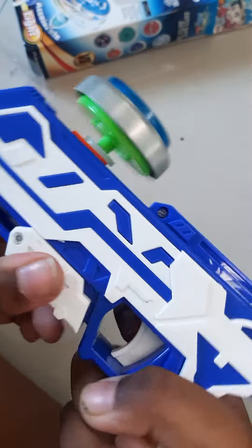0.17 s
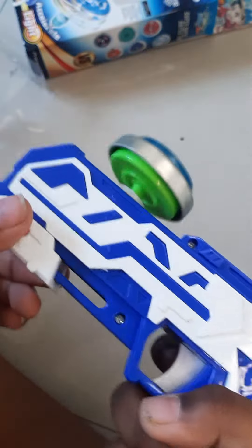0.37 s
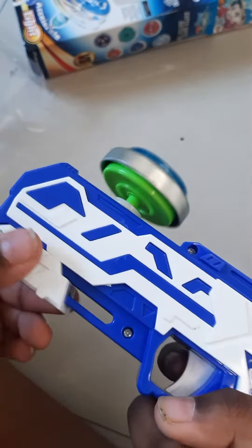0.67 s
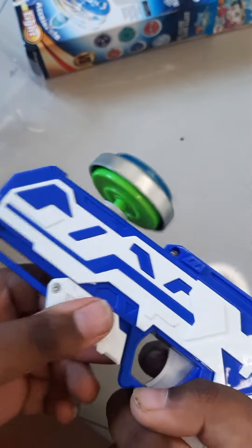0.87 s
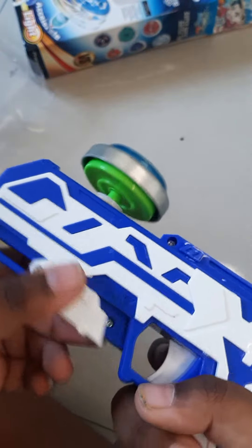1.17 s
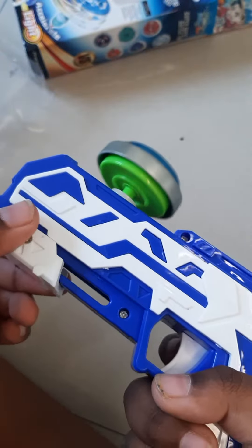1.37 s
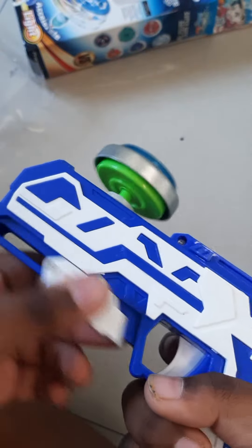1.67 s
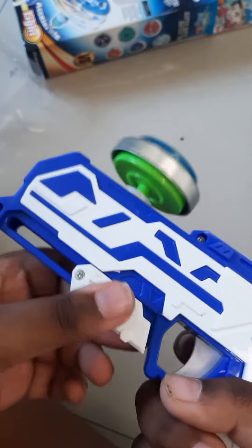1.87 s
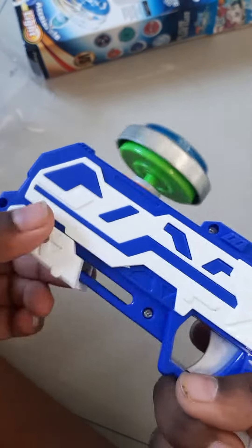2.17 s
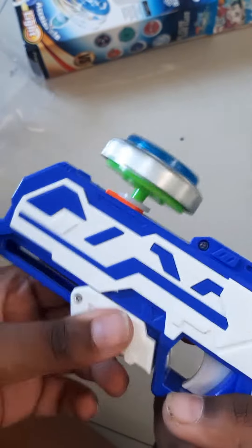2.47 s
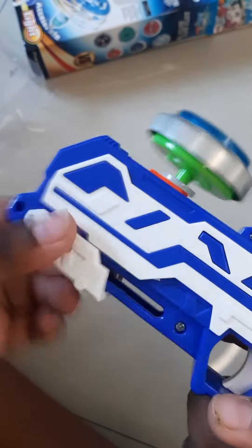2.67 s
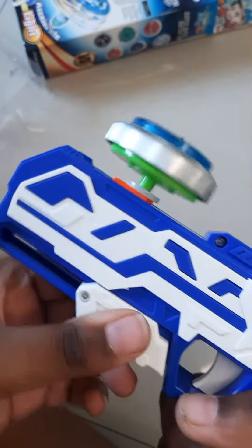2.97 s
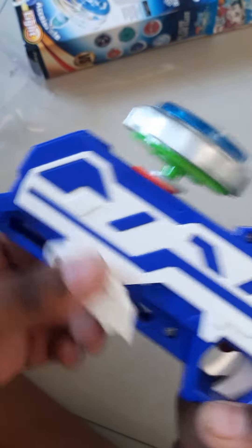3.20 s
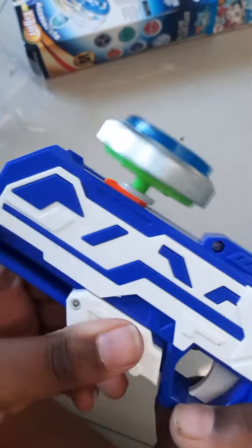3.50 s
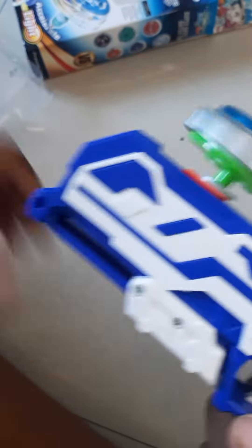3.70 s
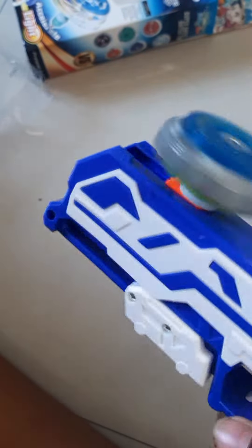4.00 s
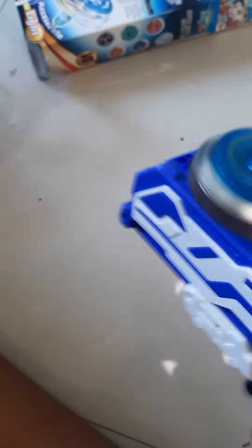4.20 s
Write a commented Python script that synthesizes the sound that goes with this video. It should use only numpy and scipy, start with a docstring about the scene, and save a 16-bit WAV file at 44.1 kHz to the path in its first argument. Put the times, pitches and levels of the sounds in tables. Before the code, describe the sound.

A plastic toy launcher is worked close to the microphone in a quiet, slightly reflective room. A spinning top whirs throughout, a thin bright rattle fluttering around fifty times a second with high ringing tones near 5 kHz, strongest around 0.25 s. The tail of a pull opens the scene; a hard cluster of gear clacks follows at 0.25-0.41 s. A ratchet return buzzes at 0.7-0.88 s, then grinding pulls crunch at 1.2-1.33, 1.97-2.06, 2.61-2.72 and 3.18-3.3 s. Between them, rising ratchet zips with a hollow ring occur at 1.59-1.74, 2.26-2.41, 2.87-3.0 and 3.38-3.5 s. Small ticks are scattered among the strokes. From about 3.73 s the slider is silent and a dry, rapid scraping grows, holding from 4 s to the end, with plastic knocks at 3.88 and around 4.25 s. Soft air, faint hum and low handling rumble remain underneath.

```python
"""Winding up a spinning top

A plastic launcher winds up a spinning top, close by in a quiet room. Its slider grinds and clacks through gears
on each pull and buzzes over a ratchet on each return: noise is shaped into tooth contacts and coloured.
The top whirs throughout and rattles once a turn; ringing filters make it sing. At the end it tilts and rubs.
Behind it lie still air, a faint motor hum and the rumble of the hands."""
import sys
import numpy as np
from scipy import signal
from scipy.fft import rfft, irfft, next_fast_len
from scipy.io import wavfile

SR = 44100
rng = np.random.default_rng(int(sys.argv[2]) if len(sys.argv) > 2 else 0)


def store_wav(level_fs):
    """Save 16-bit WAV to argv[1]."""
    pcm = np.round(np.clip(np.atleast_2d(level_fs), -1, 1) * 32767)
    wavfile.write(sys.argv[1], SR, pcm.T.astype(np.int16))


N = 191658
T = np.arange(N) / SR  # time of every sample, s
SIZE = next_fast_len(N + SR // 2, True)  # length for work on spectra, with room for tails
HZ = np.maximum(np.arange(SIZE // 2 + 1) * SR / SIZE, 1)

# How fast the top turns: [t/s, turns per s]
SPIN = [(0.0, 48.3), (0.25, 40.2), (0.34, 58.6), (0.49, 42.7), (0.66, 36.8), (0.94, 48.4), (1.15, 44.4),
        (1.41, 39.3), (1.56, 44.2), (1.96, 51.3), (2.14, 45.5), (2.59, 53.6), (2.87, 49.0), (3.09, 58.2),
        (3.43, 54.3), (3.55, 59.6), (4.35, 51.4)]
# Gear teeth catching and the slider meeting its stops: [t/s, relative level/dB, treble snap against the hit/dB]
CLACKS = [(0.0217, -15, -9), (0.2435, -17.5, -9), (0.312, -15.5, 2), (0.328, -18, -1), (0.3483, -8, -6),
          (0.3517, -14, 8), (0.363, -10, 1), (0.3849, -10, 6), (0.401, -10.5, -3), (0.4044, -15, 5),
          (0.4097, -20, -4), (0.686, -27.5, 10.5), (0.725, -18.5, 8), (0.794, -22, -9), (0.836, -21, -11),
          (0.878, -16, -1), (1.188, -18.5, -2), (1.203, -18.5, 7), (1.232, -12.5, -2), (1.245, -17, -5),
          (1.262, -11, 6), (1.282, -20, 5), (1.294, -11, 7), (1.317, -11.5, 9), (1.325, -16.5, 12.5),
          (1.347, -20.5, 11.5), (1.59, -18, 6), (1.665, -22.5, -8), (1.706, -18.5, -8), (1.742, -15.5, 7),
          (1.979, -9.5, 3.5), (2.0115, -13, 2), (2.038, -11.5, 1), (2.0575, -9.5, 2), (2.0639, -11, 2.5),
          (2.299, -11.5, 1), (2.4064, -15.5, 4), (2.634, -16, 2), (2.665, -16.5, 7.5), (2.69, -11, 0),
          (2.702, -7.5, 1), (2.867, -19, 5), (2.886, -19, 11.5), (3.005, -18.5, 6.5), (3.279, -10, -2),
          (3.376, -21.5, 8), (3.394, -16, 6), (3.407, -14, 8.5), (3.498, -17, 3)]
# Colour of the gear contacts: [f/Hz, relative level per Hz/dB]
GEARS = [(150, -30.5), (450, -20.5), (650, -15), (900, -17.5), (1250, -7), (1750, -4.5), (2600, -7),
         (4200, -1.5), (6000, -2.5), (7300, -4), (8500, -14), (10500, -12), (16000, -17)]
# Colour of the spindle contacts: [f/Hz, relative level per Hz/dB]
SPINDLE = [(300, -42.5), (1000, -14), (1650, -5.5), (2100, -13.5), (2800, -1.5), (3600, -5), (4800, 1.5),
           (5300, -6.5), (6000, -2.5), (7200, -4.5), (8400, -18.5), (11500, -13.5), (16000, -22.5)]
# Lower ringing tones of the top and its spindle: [f/Hz, width/Hz, relative level/dB]
LOWER_MODES = [(4280, 80, 0), (4890, 104, 8), (4960, 160, -24)]


def from_db(db):
    """Turn decibels into a gain."""
    return 10 ** (np.asarray(db) / 20)


def rms_one(x):
    """Scale to an average power of one."""
    return x / np.sqrt(np.mean(x ** 2) + 1e-20)


def in_time(rows, axis=1):
    """Join one column of a table with straight lines, giving a value at every sample."""
    rows = np.array(rows)
    return np.interp(T, rows[:, 0], rows[:, axis])


def over_hz(points):
    """Join the points of a short spectrum, giving a value at every frequency."""
    hz, value = np.transpose(points)
    return np.interp(np.log(HZ), np.log(hz), value)


def drift(rate):
    """Random wandering with a spread of one; rate is new values per second."""
    return rms_one(np.interp(T * rate, np.arange(N), rng.standard_normal(N)))


def hiss():
    """White noise at two microphone ports: it reaches the right one later, and the treble differs between them."""
    # How alike the two ports are: [f/Hz, correlation]
    likeness = [(40, 0.15), (130, 0.48), (350, 0.87), (1600, 0.95), (3000, 0.82), (4500, 0.11),
                (6000, 0.028), (15000, 0.098)]
    port_lag_s = 0.00014
    alike = np.clip(over_hz(likeness), 0, .98)
    mid, side = rfft(rng.standard_normal((2, SIZE))) * np.sqrt([1 + alike, 1 - alike])
    left = mid + side
    right = (mid - side) * np.exp(-2j * np.pi * HZ * port_lag_s)
    return rms_one(irfft([left, right], SIZE)[:, :N])


def colour(x, spectrum):
    """Filter to a given spectrum at unit power gain, without sounding ahead of the input (minimum phase)."""
    cepstrum = irfft(np.log(rms_one(from_db(over_hz(spectrum)))), SIZE)
    # folding the second half onto the first puts all of the response after the input
    cepstrum[1:SIZE // 2] *= 2
    cepstrum[SIZE // 2 + 1:] = 0
    return irfft(rfft(x, SIZE) * np.exp(rfft(cepstrum)), SIZE)[..., :N]


def resonate(x, hz, width_hz):
    """One ringing tone of unit power gain; the narrower it is, the longer it rings."""
    r = np.exp(-np.pi * width_hz / SR)
    gain = np.sqrt((1 - r * r) / 2)
    feedback = [1, -2 * r * np.cos(2 * np.pi * hz / SR), r * r]
    return signal.lfilter(gain * np.array([1, 0, -1]), feedback, x + 1e-18)


def edge(x, hz, kind):
    """Gentle low-pass or high-pass filter."""
    return signal.sosfilt(signal.butter(1, min(hz, SR / 3), kind, fs=SR, output="sos"), x + 1e-18)


def blow(s, decay_s, rise_s=0.00033):
    """Loudness shape of one contact: a quick rise, then a dying away."""
    age = np.maximum(T - s, 0)
    return (1 - np.exp(-age / rise_s)) * np.exp(-np.minimum(age / decay_s, 50))


def bump(centre_s, width_s):
    """A smooth swell and fade of height one."""
    return np.exp(-np.minimum(((T - centre_s) / width_s) ** 2, 50))


def stroke(start, end, attack_s, release_s, swell_db):
    """Loudness shape of one move of the slider: it sets in, swells towards the stop and dies away."""
    travel = np.clip((T - start) / (end - start), 0, 1)
    attack = np.clip((T - start) / attack_s, 0, 1)
    release = np.exp(-np.clip((T - end) / release_s, 0, 50))
    return attack * release * from_db(swell_db * (travel - .5))


def chatter(rate, spread_db, decay_s):
    """Loudness shape of contacts repeating at a rate per second, each of its own strength; rms 1."""
    touches = np.diff(np.floor(np.cumsum(rate) / SR), prepend=0)
    sizes = from_db(spread_db * np.clip(rng.standard_normal(N), -2, 1.5))
    return rms_one(signal.lfilter([1], [1, -np.exp(-1 / (decay_s * SR))], touches * sizes))


def sing(friction, modes, waver_db=3):
    """Friction keeps a set of tones ringing, each wavering on its own; rms 1."""
    tones = 0
    for hz, width, db in modes:
        tones = tones + from_db(db + waver_db * drift(23.07)) * resonate(friction, hz, width)
    return rms_one(tones)


def top(rattle_db=-2, lower_db=-2, loose_db=-5):
    """The unbalanced top strikes its bearing once a turn, loose gears chatter between, and its modes sing."""
    # How hard the spindle shakes in its bearing: [t/s, relative rattle level/dB, relative singing level/dB]
    shake = [(0.0, -26, -45), (0.25, -38, -28.5), (0.55, -32, -40), (1.5, -32.5, -39.5), (1.82, -29, -37.5),
             (2.15, -31, -42), (2.5, -34, -36.5), (2.85, -32.5, -44), (3.3, -33, -39), (3.75, -32, -43.5),
             (4.35, -32, -39)]
    # Upper ringing tones of the top: [f/Hz, width/Hz, relative level/dB]
    upper_modes = [(5670, 120, 9), (6160, 140, -13), (6755, 40, -2)]
    turns = in_time(SPIN)
    once = chatter(turns, spread_db=1.9, decay_s=.0038)
    once = rms_one(edge(once, 150, "low"))  # each touch is a short scuff
    loose_rate = turns * 4.3 * from_db(2.5 * drift(150))
    loose = chatter(loose_rate, spread_db=7, decay_s=.0009)
    # .32 is a steady share of friction
    force = rms_one(np.sqrt(once ** 2 + (from_db(loose_db) * loose) ** 2 + .32 ** 2))
    grain = hiss()
    # no two touches are equally bright
    grain = grain + edge(grain, 9400, "high") * (from_db(4.2 * drift(50)) - 1)
    rattle = from_db(in_time(shake) + rattle_db) * colour(grain * force, SPINDLE)
    lower = from_db(lower_db) * sing(hiss() * force, LOWER_MODES)
    upper = sing(hiss() * force, upper_modes)
    return rattle + from_db(in_time(shake, axis=2)) * (lower + upper)


def ticks(level_db=4, ring_db=-10):
    """Now and then the top jumps in its catch, which sets its lower modes ringing."""
    # The top knocking against its catch: [t/s, relative level/dB]
    jumps = [(0.0883, -24.5), (0.135, -21.5), (0.198, -31), (0.581, -22.5), (0.5885, -37), (0.945, -25),
             (1.03, -29), (1.864, -22.5), (1.885, -24.5), (2.259, -23), (3.023, -16), (3.537, -22),
             (3.674, -19.5), (4.064, -18), (4.135, -25), (4.231, -22.5), (4.263, -21.5)]
    force = sum(from_db(db + level_db) * blow(s, decay_s=.0017, rise_s=.0006) for s, db in jumps)
    strike = hiss() * force
    ring = sum(from_db(db + ring_db) * resonate(strike, hz, width) for hz, width, db in LOWER_MODES)
    return colour(strike, SPINDLE) + ring


def pulls(level_db=-2, teeth_per_s=230):
    """The rack grinds unevenly through the gear train, swelling as the spring tightens."""
    # The slider is pulled against the gears: [start t/s, end t/s, relative level/dB]
    moves = [(-0.1, 0.024, -19), (0.25, 0.412, -27), (1.195, 1.332, -21), (1.967, 2.06, -23.5),
             (2.612, 2.722, -24), (3.181, 3.305, -25)]
    effort = 0
    for start, end, db in moves:
        effort = effort + from_db(db) * stroke(start, end, attack_s=.008, release_s=.0065, swell_db=1.5)
    teeth = chatter(teeth_per_s * from_db(3 * drift(120)), spread_db=3, decay_s=.0024)
    return colour(hiss() * teeth * effort, GEARS) * from_db(level_db)


def clacks(level_db=7.0, snap_hz=8000, ring_db=-7, ring_s=0.007, rebound_s=0.0024, rebound_db=-5):
    """Hard contacts, each with a quick rebound: a crack in the shell and a short ring of the casing."""
    force = snap = 0
    lags = rng.uniform(.5, 1.5, len(CLACKS))  # every rebound comes a little sooner or later
    for (s, db, snap_db), lag in zip(CLACKS, lags):
        first = blow(s, decay_s=.0015, rise_s=.0009)
        again = blow(s + rebound_s * lag, decay_s=.0015, rise_s=.0009)
        hit = from_db(db + level_db) * np.hypot(first, from_db(rebound_db) * again)
        force = force + hit
        snap = snap + hit * from_db(snap_db)
    grain = hiss()
    highs = edge(grain, snap_hz, "high")
    crack = force * (grain - highs) + snap * highs
    return colour(crack + from_db(ring_db) * panel_rings(ring_s), GEARS)


def panel_rings(decay_s, count=32):
    """Each contact lands on another spot of the casing and rings a set of modes of its own."""
    out, age = np.zeros((2, N)), T[:SR // 20]
    swell = (1 - np.exp(-age / .0015)) * np.exp(-age / decay_s)
    draws = rng.random((len(CLACKS), 4, count, 1))
    for (s, db, _), (place, size, phase, skew) in zip(CLACKS, draws):
        hz = 2500 + 12000 * place ** 1.4
        modes = size ** 2 * np.exp(2j * np.pi * (hz * age + phase))
        left = modes.sum(axis=0)
        right = (modes * np.exp(2j * np.pi * skew)).sum(axis=0)  # same modes, other phases
        start = round(s * SR)
        out[:, start:start + len(age)] += from_db(db) * rms_one(np.real([left, right])) * swell
    return out


def returns(buzz_db=3, teeth_per_s=300):
    """The pawl skips quickly over the teeth; late in the stroke the rack rings, gliding as the slider moves."""
    # The slider runs back: [start t/s, end t/s, relative buzz level/dB, ring level/dB,
    # ring pitch at its loudest f/Hz, glide Hz per s]
    moves = [(0.699, 0.876, -33, -36, 1715, 500), (1.586, 1.738, -31.5, -34, 1480, -300),
             (2.258, 2.41, -31, -29, 1534, -1500), (2.865, 3.001, -34, -29, 1533, 1303),
             (3.375, 3.495, -33, -30, 1614, 300)]
    # Colour of the ratchet contacts: [f/Hz, relative level per Hz/dB]
    ratchet = [(200, -23), (550, -56), (700, -9), (950, -12), (1350, -6.5), (2100, -4.5), (3300, -0.5),
               (4600, 0), (6000, -7), (7300, -7), (8500, -16.5), (11000, -16), (16000, -35)]
    ring_place, ring_width = 0.71, 0.26  # where the rack rings most and how widely, shares of the stroke
    teeth = chatter(teeth_per_s * from_db(1.2 * drift(60)), spread_db=2.6, decay_s=.0022)
    buzz = hollow = ring_hz = 0
    for start, end, db, hollow_db, hz, glide in moves:
        # the buzz swells as the slider gathers speed
        buzz = buzz + from_db(db) * stroke(start, end, attack_s=.0083, release_s=.011, swell_db=6.5)
        peak_s = start + ring_place * (end - start)
        hollow = hollow + from_db(hollow_db) * bump(peak_s, ring_width * (end - start))
        ring_hz = np.where(T > start, hz + glide * (np.minimum(T, end) - peak_s), ring_hz)
    # shift the gliding pitch down to zero, keep a narrow band there, and shift it back
    turn = np.exp(2j * np.pi * np.cumsum(ring_hz) / SR)
    narrow = signal.butter(2, 105, fs=SR, output="sos")
    ring = rms_one(np.real(turn * signal.sosfilt(narrow, hiss() * teeth / turn)))
    return from_db(buzz_db) * colour(hiss() * teeth * buzz, ratchet) + hollow * ring


def rub(start_s=3.73, rise_s=0.28, level_db=-33.5):
    """The launcher tilts and the leaning top scrapes its seat, with pressure growing to a steady hold."""
    # Colour of the seat contacts: [f/Hz, relative level per Hz/dB]
    seat = [(300, -18), (650, -8), (950, 2), (1250, -10), (1650, -10), (2200, -5), (2750, 11), (3300, -8),
            (4300, 3), (4900, -3), (5400, 7), (7000, -6), (9000, -13), (16000, -9)]
    rate = in_time(SPIN) * 3.2 * from_db(2.5 * drift(100))
    scrape = chatter(rate, spread_db=4.5, decay_s=.0028)
    pressure = np.clip((T - start_s) / rise_s, 0, 1)
    return from_db(level_db) * pressure * colour(hiss() * scrape, seat)


def knocks(level_db=-2, decay_s=0.0053, width_hz=340):
    """The shell knocks in the hand: short bursts of noise through broad resonances."""
    # Knocks of the shell: [t/s, relative level/dB, pitch f/Hz]
    hits = [(2.702, -24, 725), (2.702, -35.5, 130), (3.88, -29, 1640), (4.244, -19, 2250),
            (4.282, -25, 940), (4.283, -23, 1770)]
    grain = hiss()
    return sum(from_db(db + level_db) * resonate(grain * blow(s, decay_s), hz, width_hz) for s, db, hz in hits)


def shell(x):
    """The hollow body rings with every contact; how strongly each mode answers wanders at random."""
    # Ringing tones of the plastic shell: [f/Hz, width/Hz, middle level/dB]
    modes = [(1060, 130, -10), (1295, 24, -18), (1771, 66, -0.5), (2135, 24, -15.5), (3430, 69, -6.5),
             (4210, 40, -11), (4540, 120, -3), (5930, 62, -1.5), (6820, 110, -3), (7590, 140, -12),
             (10170, 65, -2), (10350, 70, -9.5)]
    out = x
    for hz, width, db in modes:
        out = out + signal.lfilter(*signal.iirpeak(hz, hz / width, fs=SR), x * from_db(db + 4 * drift(25)))
    return out


def room(x, t60=0.3, wet_db=-11, first_s=0.00473):
    """Floor and walls return a diffuse tail, different at each port; t60 is the time to fall by 60 dB."""
    age = T[:SR // 2]
    tail = rng.standard_normal((2, len(age))) * from_db(-60 * age / t60) * (age > first_s)
    tail = edge(rms_one(tail), 18000, "low") / np.sqrt(len(age))
    return x + from_db(wet_db) * signal.fftconvolve(x, tail, axes=1)[:, :N]


def hands(hold_db=-62):
    """The grip rumbles faintly, and more whenever the fingers shift."""
    # The hands shift on the grip: [t/s, length/s, added rumble level/dB]
    shifts = [(1.332, 0.096, -55), (1.695, 0.1, -58), (1.92, 0.13, -57), (2.663, 0.04, -50),
              (3.61, 0.086, -56), (4.054, 0.099, -55)]
    # Colour of the rumble: [f/Hz, relative level per Hz/dB]
    rumble = [(25, -36), (55, -3), (100, 3.5), (160, -1), (300, -27.5), (2000, -64)]
    grip = from_db(hold_db) + sum(from_db(db) * bump(s, length_s) for s, length_s, db in shifts)
    return grip * colour(hiss(), rumble)


def still_air():
    """The air of the room: softly coloured noise whose level changes slowly."""
    # Level of the air: [t/s, level/dB]
    level = [(0, -44.5), (1.2, -44), (2.3, -45), (3.2, -48.5), (3.8, -49), (4.35, -44)]
    # Colour of the air: [f/Hz, relative level per Hz/dB]
    air = [(25, -21), (55, -31), (100, -13.5), (180, -4), (260, -4), (400, 1), (520, -4.5), (700, -3),
           (1000, -7), (2000, -4), (6000, -47), (16000, -55)]
    return from_db(in_time(level)) * colour(hiss(), air)


def hum(waver_db=3):
    """A faint motor hum: steady tones that waver in level and pitch."""
    # Tones of the hum: [middle f/Hz, middle level/dB]
    tones = [(199.7, -64.5), (399.9, -68.5), (599.9, -62.5)]
    wobbly_time = T + .0005 * drift(11)
    out = 0
    for hz, db in tones:
        tone = np.sqrt(2) * np.sin(2 * np.pi * hz * wobbly_time)
        out = out + from_db(db + waver_db * drift(14)) * tone
    return out


def scene():
    """The toy in the room, over still air, a faint hum and the rumble of the hands."""
    launcher = shell(ticks() + pulls() + clacks() + returns())
    toy = room(launcher + top() + rub() + knocks())
    # the highest treble is stronger on the left
    toy = toy + edge(toy, 15400, "high") * np.array([[.25], [-.25]])
    return toy + still_air() + hum() + hands()


def record(dry):
    """The highest peaks are rounded and the top of the treble is cut."""
    rounded = .9 * np.tanh(dry / .9)
    treble_cut = signal.ellip(10, .1, 80, 15800, fs=SR, output="sos")  # cutoff in Hz
    return signal.sosfilt(treble_cut, rounded)


dry = scene()
out = record(dry)
store_wav(out)
```